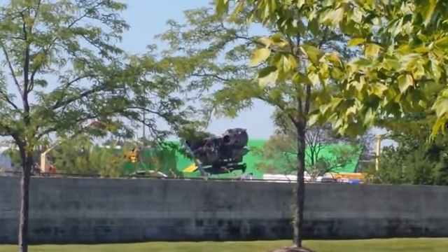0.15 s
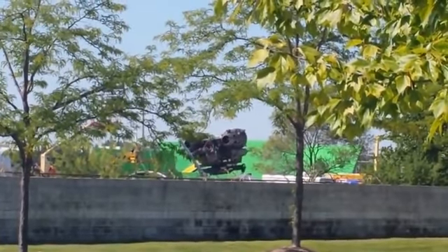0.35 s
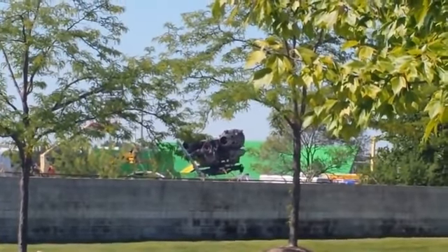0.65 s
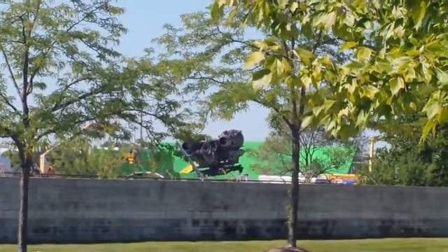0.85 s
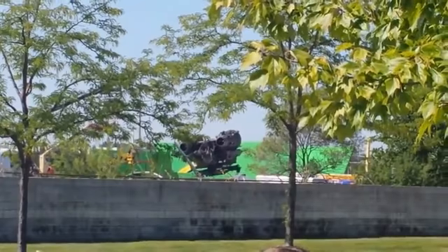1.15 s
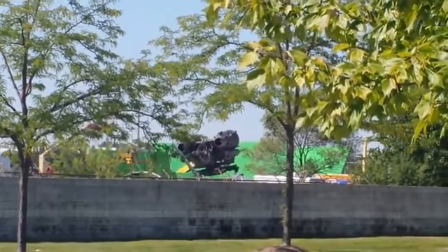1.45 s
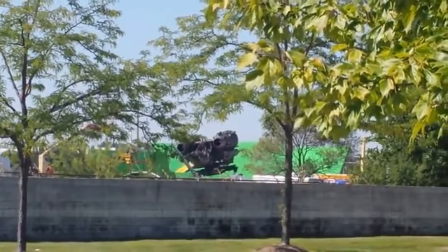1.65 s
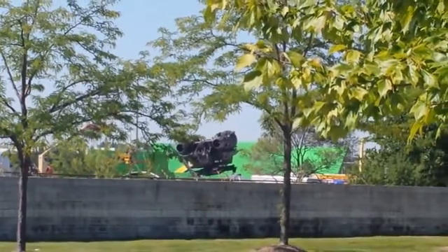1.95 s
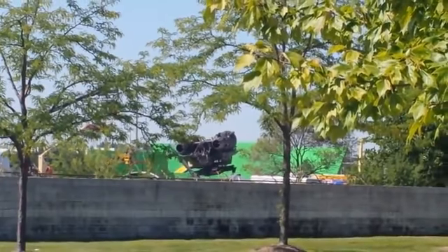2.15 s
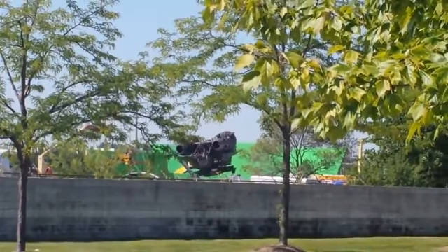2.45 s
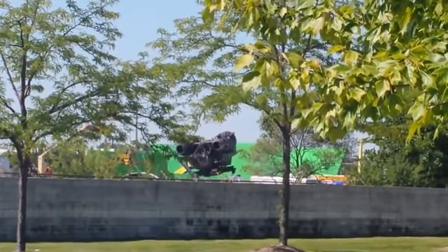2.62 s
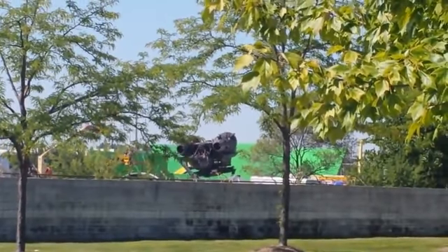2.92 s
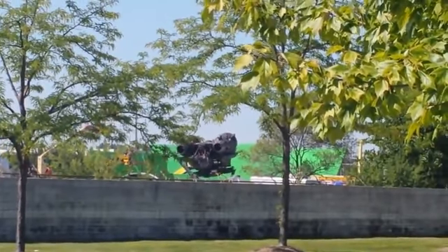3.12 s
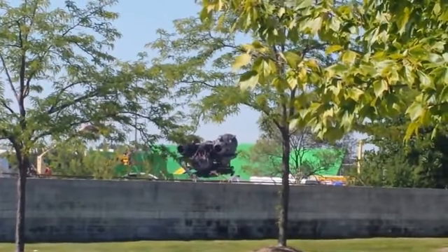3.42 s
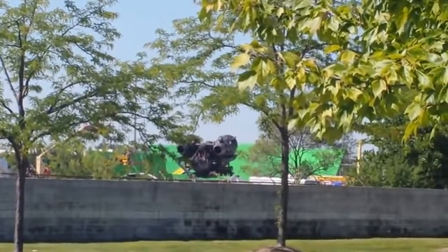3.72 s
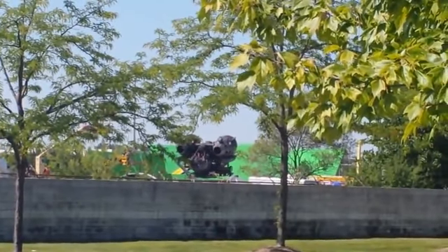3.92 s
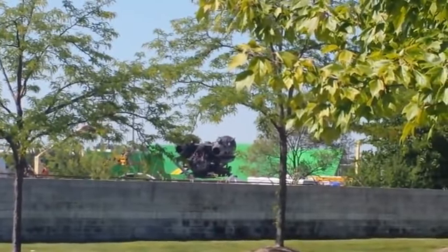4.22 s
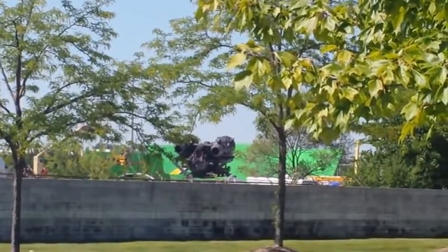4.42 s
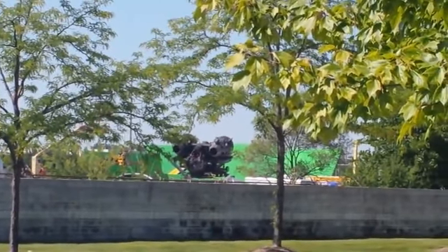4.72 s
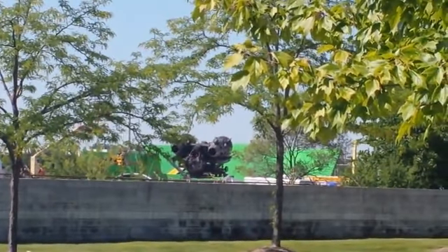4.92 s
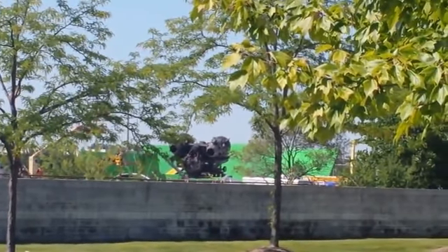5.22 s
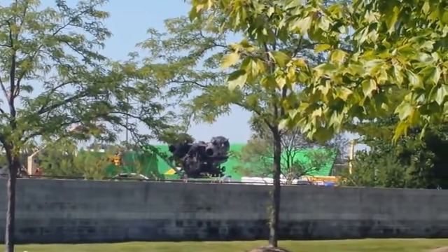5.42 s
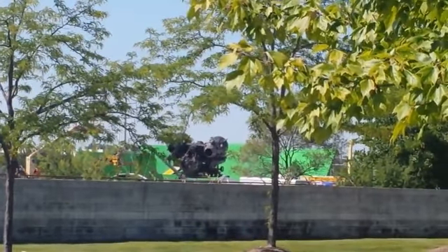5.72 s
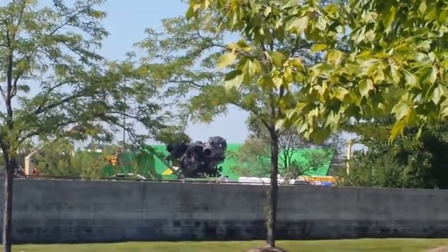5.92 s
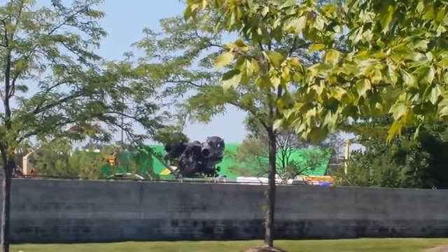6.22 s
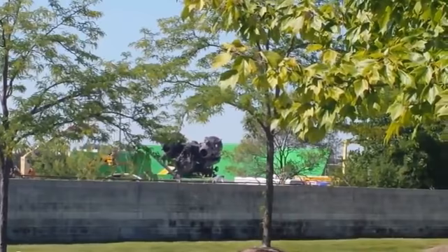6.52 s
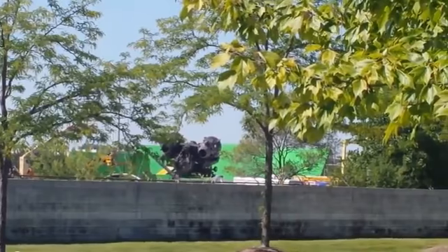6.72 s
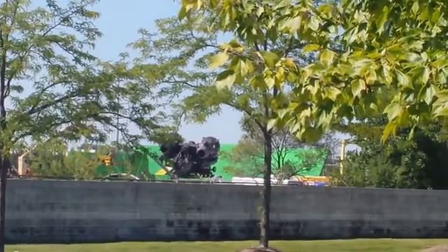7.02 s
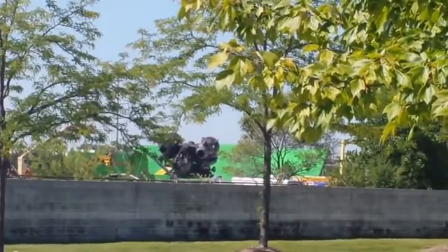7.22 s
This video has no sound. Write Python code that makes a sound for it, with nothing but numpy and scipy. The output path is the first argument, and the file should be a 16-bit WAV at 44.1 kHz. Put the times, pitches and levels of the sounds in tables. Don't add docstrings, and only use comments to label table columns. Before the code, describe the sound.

A small camera microphone outdoors hears bright cricket trills leaning right, above a low wavering hum of distant motors and traffic. A steady cicada buzz fills the middle highs and fades near the end, while a second, rough and hissy cicada swells from halfway. A sharp twig tick comes early, small sparrow chips come in clusters from the left, and dry leaves scuff softly near the close.

```python
import sys
import numpy as np
from scipy import signal
from scipy.fft import rfft, irfft, next_fast_len
from scipy.io import wavfile

SR = 44100
rng = np.random.default_rng(int(sys.argv[2]) if len(sys.argv) > 2 else 0)


def level_to_linear(level):
    exponent = np.asarray(level, float) / 20
    return 10 ** exponent


def persist_wave(psi):
    counts = np.round(np.clip(psi, -1, 1) * 32767).astype(np.int16)
    wavfile.write(sys.argv[1], SR, np.atleast_2d(counts).T)


N = 324576
TIME = np.arange(N) / SR
SLOW_STEP = 64
PORT_LAG = 16


def rms_one(x):
    return x / np.sqrt(np.mean(x ** 2) + 1e-20)


def in_time(rows):
    s, *columns = np.transpose(rows)
    return [np.interp(TIME, s, column) for column in columns]


def at_hz(points, hz, column=1):
    points = np.array(points)
    return np.interp(np.log(hz + 1), np.log(points[:, 0]), points[:, column])


def bumps(rows, at_s, order):
    return sum(gain_db * np.exp(-((at_s - s) / half_s) ** order) for s, half_s, gain_db in rows)


def drift(rate, count):
    pole = np.exp(-2 * SLOW_STEP * np.pi * rate / SR)
    white = rng.standard_normal((count, N // SLOW_STEP + 1002))
    slow = signal.lfilter([1], [1, -2 * pole, pole * pole], white)[:, 1000:]
    return slow / slow.std(axis=1, keepdims=True)


def full(slow):
    return np.repeat(slow, SLOW_STEP)[:N]


def shaped(white, gain_db):
    size = next_fast_len(N)
    hz = np.arange(size // 2 + 1) * SR / size
    return irfft(rfft(white, size) * level_to_linear(gain_db(hz)), size)[..., :N]


def foliage(x, t60):
    tail = rng.standard_normal((2, 4000)) * level_to_linear(-60 * np.arange(4000) / SR / t60)
    tail /= np.linalg.norm(tail, axis=1, keepdims=True)
    return signal.fftconvolve(x[None], tail, axes=1)[:, :N]


def arch(since, top_hz, fall_hz, rise_s, fall_s, climb, tail_db, knee):
    rising = since < 0
    along = np.clip(np.where(rising, since / rise_s, since / fall_s), -1, 1)
    bend = (np.hypot(along, knee) - knee) / (np.hypot(1, knee) - knee)
    hz = top_hz - fall_hz * np.where(along < 0, climb, 1) * bend
    fade = np.tanh(along * np.where(along < 0, .6, 1) / .45) ** 2
    level = level_to_linear(tail_db * fade) * np.sqrt(1 - along ** 6)
    return level * np.sqrt(2) * np.sin(2 * np.pi * np.cumsum(hz) / SR)


def trill(strokes, top_hz, fall_hz, rise_s, fall_s, climb, tail_db, uneven_db):
    nearest = np.round(strokes).astype(int)
    late, louder, sharper = rng.standard_normal((200, 3))[nearest % 200].T
    since = (strokes - nearest) / np.gradient(strokes) / SR + .0007 * late
    whistle = arch(since, top_hz + 20 * sharper, fall_hz, rise_s, fall_s, climb, tail_db, 1.8)
    return level_to_linear(uneven_db * louder) * whistle


def traffic():
    # (frequency [Hz], density [dB per Hz])
    rumble = [(12, -43), (20, -59), (42, -3), (86, -1.5), (136, 1), (160, -3.5), (198, -5.5), (217, -7),
              (238, -10.5), (280, -9.5), (329, -18.5), (455, -21.5), (619, -21), (665, -20), (1500, -34.5),
              (1950, -49), (3300, -120)]
    # (frequency [Hz], left-right likeness [-1..1])
    likeness = [(60, .985), (130, .97), (290, .94), (620, .5), (1100, -.35), (2000, 0.0)]

    def alike(hz):
        return np.clip(at_hz(likeness, hz), -.9, .999)

    mid, side = rng.standard_normal((2, N))
    mid = shaped(mid, lambda hz: at_hz(rumble, hz) + 10 * np.log10(1 + alike(hz)))
    side = shaped(side, lambda hz: at_hz(rumble, hz) + 10 * np.log10(1 - alike(hz)))
    return level_to_linear(-35) * rms_one(mid + side * [[1], [-1]]) * level_to_linear([[.6], [-.6]])


def engines():
    # (rate [Hz], [(multiple, level [dB])])
    motors = [(209.5, [(1, 1)]), (189.0, [(1, 3.5), (3, -13.5), (4, -17.5)])]
    idle_db = [-42.5, -44.5, -48]
    # (middle [s], half length [s], gain [dB])
    surges = [
        [(.68, .2, 10), (1.4, 0.17, 10), (2.62, 0.065, 11), (3.0, 0.23, 8), (3.7, 0.11, 6), (4.15, 0.15, -15),
         (5.0, .3, 7), (5.85, 0.19, 9.5), (6.46, 0.12, 12.5), (7.03, 0.14, 11.5)],
        [(.2, 0.95, 3), (.94, 0.27, 4.5), (2.47, 0.24, 11), (3.0, 0.14, 5.5), (3.73, .15, 7), (4.85, 0.52, 7),
         (5.6, 0.64, 2.5), (6.25, 0.26, 3.5), (7.2, 0.43, 4)],
        [(.1, 0.44, 6.5), (1.3, 0.57, 6.5), (2.1, 0.19, 5.5), (2.65, .1, -13), (3.3, .4, 7), (5.0, 0.32, 7.5),
         (5.9, 0.62, 5), (6.8, .4, 3)],
    ]
    # (time [s], pitch [Hz], level [dB])
    gear = [(0, 628, -67), (.9, 627, -57), (1.8, 626, -61), (2.1, 625, -52), (2.45, 624, -63),
            (2.7, 624, -50), (4, 628, -59.5), (5.3, 632, -61.5), (5.8, 636, -75)]
    throb_db, *motor_db = [db + bumps(rows, TIME, order=2) for db, rows in zip(idle_db, surges)]
    wobble = drift(1.454, count=3)
    throb_hz = 91.1 + 2.493 * full(wobble[2])
    out = level_to_linear(throb_db - 0.5) * np.sin(2 * np.pi * np.cumsum(throb_hz) / SR)
    for (hz, orders), level_db, wave in zip(motors, motor_db, wobble):
        phase = 2 * np.pi * np.cumsum(hz + .45 * full(wave)) / SR
        out += sum(level_to_linear(level_db + db - 0.5) * np.sin(k * phase) for k, db in orders)
    whine_hz, whine_db = in_time(gear)
    out += level_to_linear(whine_db - 1.5) * np.sin(2 * np.pi * np.cumsum(whine_hz) / SR)
    return out * level_to_linear([[.6], [-.6]])


def rustle():
    # (frequency [Hz], left density [dB per Hz], right density [dB per Hz])
    hiss_colour = [(650, 2, -0.5), (1500, 0, -2), (2270, -1, -7), (3270, -7, -9.5), (4270, -4.5, -7.5),
                   (5520, -2, -9), (6440, 2.5, -2.5), (7230, -3.5, -3), (8830, -5, 7), (8960, -13, -3.5),
                   (9800, -9.5, -7), (12060, -22, -15.5), (12600, -28, -23), (14500, -39, -34)]
    # (time [s], level [dB])
    breeze = [(0, -54.5), (2, -54.3), (4, -54), (6.2, -54), (6.5, -52), (6.8, -54.5), (7.36, -54)]
    # (time [s], level [dB], decay t60 [s])
    scuffs = [(6.488, -42.5, .4), (6.375, -49, .25), (6.585, -48, .15), (6.64, -50, .2), (6.098, -49, .06)]

    def colour(hz):
        return [at_hz(hiss_colour, hz, c) - 60 * (hz < 600) for c in (1, 2)]

    left, right, both = rng.standard_normal((3, N))
    white = np.array([left + 0.41 * np.roll(both, PORT_LAG), right + 0.49 * both])
    scuff = sum(level_to_linear(db - 60 * np.clip(TIME - s, 0, 1) / t60) * (TIME > s) for s, db, t60 in scuffs)
    dry_leaf = signal.butter(2, [2200, 6200], "band", fs=SR, output="sos")
    crackle = signal.sosfilt(dry_leaf, rng.standard_normal((2, N)))
    hiss = level_to_linear(in_time(breeze)[0] + 13) * rms_one(shaped(white, colour))
    return hiss + scuff * rms_one(crackle)


def sparrows():
    # (time of the top [s], top pitch [Hz], fall [Hz], level [dB])
    chips = [(.625, 4300, 300, -58), (.685, 4150, 1200, -57), (.75, 3500, 1000, -60), (.94, 4300, 700, -59),
             (1.795, 4600, 1800, -50), (1.907, 4600, 1900, -49), (1.932, 4100, 600, -53),
             (2.019, 4600, 1400, -50), (2.037, 4100, 1200, -51), (2.141, 4200, 1400, -52),
             (2.152, 4550, 1000, -53), (3.44, 4600, 900, -58), (3.55, 4200, 700, -59),
             (3.833, 4550, 1800, -43), (3.951, 4400, 1400, -44), (4.082, 4400, 1100, -46),
             (3.855, 2850, 200, -55), (4.06, 2650, 200, -56), (6.495, 4000, 200, -55),
             (4.778, 4250, 900, -58), (5.097, 4000, 1100, -51), (5.252, 4950, 1000, -52),
             (5.37, 4250, 1300, -55.5), (6.097, 4600, 1200, -60), (6.6, 5050, 200, -51)]
    out = np.zeros(N)
    for s, top_hz, fall_hz, level_db in chips:
        fall_s = .005 + fall_hz / 125000
        near = slice(round((s - .05) * SR), round((s + .06) * SR))
        out[near] += level_to_linear(level_db) * arch(TIME[near] - s, top_hz, fall_hz, .010, fall_s, .25, -5.5, .5)
    direct = np.array([level_to_linear(5) * out, level_to_linear(-5) * np.roll(out, 1)])
    return direct + level_to_linear(-12) * foliage(out, .08)


def twigs():
    # (time [s], peak [dB], ring [Hz], decay t60 [s])
    ticks = [
        (1.2758, -9.5, 5700, 0.004),
        (1.2758, -27, 2000, .005),
        (1.2758, -40, 12500, .004),
    ]
    out, since = np.zeros(N), TIME[:2000]
    for s, level_db, hz, t60 in ticks:
        onset = np.tanh(since / 0.00028)
        ring = level_to_linear(level_db - 60 * since / t60) * onset * np.sin(2 * np.pi * hz * since)
        out[round(s * SR):][:2000] += ring
    return out * level_to_linear([[1.5], [-12]])


def swelling_cicada():
    # (time [s], buckling rate [Hz], effort [dB])
    song = [(0, 160, -67), (2.5, 160, -78), (3.5, 160, -47), (4.5, 160.5, -45.5), (5.3, 161, -42),
            (5.9, 162.3, -38.5), (6.3, 162.7, -38), (6.6, 163.1, -36.5), (7.0, 163.2, -34.5),
            (7.36, 163.5, -32)]
    # (frequency [Hz], left [dB], right [dB])
    drum_colour = [(4100, -17.5, -25.5), (5220, -9.5, -13), (6400, 0, -13), (6380, -12, -5),
                   (6780, -5, -1.5), (7940, 0.5, 3.5), (7920, -3, 0), (8840, -11, -1), (9280, -10, -5.5),
                   (11000, -17.5, -15), (12050, -19.5, -13.5), (13500, -19, -31), (14300, -42, -42),
                   (14400, -27, -24)]
    rate_hz, effort_db = in_time(song)
    phase = 2 * np.pi * np.cumsum(rate_hz) / SR
    start = 9 * SR // 2
    flicker = drift(17.4, count=4 * 56).reshape(56, 2, 2, -1)
    comb = np.zeros((2, N))
    for k, sides in zip(range(29, 81), flicker):
        sine, cosine = np.sin(k * phase[start:]), np.cos(k * phase[start:])
        for side, (a, b) in enumerate(sides):
            comb[side, start:] += full(a)[start:] * sine + full(b)[start:] * cosine
    hiss = rng.standard_normal((2, N)) * (1 + .5 * np.cos(phase))
    drums = rms_one(comb) + level_to_linear(7.0) * hiss
    heard = shaped(drums, lambda hz: [at_hz(drum_colour, hz, c) for c in (1, 2)])
    return level_to_linear(effort_db) * rms_one(heard)


def cicada():
    # (time [s], buckling rate [Hz])
    song = [(0, 200.6), (1.25, 201.68), (2, 202.0), (3, 202.62), (4, 202.79), (4.5, 202.74), (5.25, 202.2),
            (5.75, 201.38)]
    # (multiple, left level [dB], right level [dB])
    multiples = [(25, -66.6, -75.2), (26, -68.4, -78.2), (27, -56.3, -67.5), (28, -55.1, -70.3),
                 (29, -52.6, -68.0), (30, -58.7, -70.1), (31, -49.3, -60.3), (32, -64.6, -67.0),
                 (33, -53.9, -60.0), (34, -67.0, -70.3), (35, -51.6, -53.0), (36, -63.4, -62.5),
                 (37, -50.4, -51.1), (38, -63.7, -62.7), (39, -55.0, -55.3), (40, -65.3, -58.4),
                 (41, -54.6, -53.6), (42, -63.6, -56.1)]
    # (multiple, middle [s], half length [s], gain [dB])
    glints = [(27, 0.31, 0.2, 5), (27, 1.7, 0.43, 7), (27, 3.3, 0.9, 9), (28, .95, 0.41, 11),
              (28, 1.86, 0.33, 10), (28, 2.9, 0.25, 7), (29, 0.46, 0.45, 6.5), (29, 2.2, 0.69, 4),
              (29, 3.7, 0.56, 12), (30, 1.31, 0.17, 15.5), (31, 0.9, .2, 5), (31, 2.13, .6, 8.5),
              (31, 3.4, 0.62, 8.5), (31, 4.85, .25, 4), (33, 1.1, 0.73, 4.5), (35, 2.45, .3, 5),
              (35, 3.06, 0.18, 2), (35, 3.43, 0.36, 9), (35, 5.17, .25, 14), (37, 0.61, 0.29, 8.5),
              (37, 1.36, 0.15, 8), (37, 2.43, .2, 7), (37, 3.65, 0.41, 2), (39, 0.31, 0.4, 14),
              (39, 4.1, .65, 10), (41, 1.18, 0.34, 13), (41, 2, .4, 3), (41, 3.33, 1, 12),
              (41, 4.75, 0.18, 10)]
    rate_hz, = in_time(song)
    phase = 2 * np.pi * np.cumsum(rate_hz + .1 * full(drift(3.0, count=1)[0])) / SR
    fades = drift(3.9, count=3 * len(multiples)).reshape(-1, 3, N // SLOW_STEP + 2)[..., :-1]
    out, slow_s = np.zeros((2, N)), TIME[::SLOW_STEP]
    for (k, *side_db), (both, *own) in zip(multiples, fades):
        openings = [row[1:] for row in glints if round(row[0]) == k]
        swell_db = -5 + bumps(openings, slow_s, order=4)
        for side in (0, 1):
            level_db = side_db[side] + swell_db + 2.5 * both + 1.5 * own[side]
            out[side] += full(level_to_linear(level_db)) * np.sin(k * phase + full(0.77 * own[side]) + k * k)
    return out * level_to_linear(2.0 + np.interp(TIME, [4.6, 5.6, 6.4], [0, -3, -25]))


def crickets():
    # (time [s], strokes so far)
    nearest_pace = [(-.1177, 0), (1.629, 32), (2.0715, 40), (2.507, 48), (3.3878, 64), (3.8266, 72),
                    (4.7106, 88), (5.8099, 108), (6.6786, 124), (7.5626, 140)]
    # (time [s], level [dB])
    nearest_level = [(0, -33.3), (1.5, -33.3), (3, -32.8), (4.5, -32.5), (6, -33), (7.36, -32)]
    # (time [s], strokes so far, level [dB])
    second = [(-.2, 0, -42), (.649, 16, -52), (.857, 20, -52.7), (1.482, 32, -41), (2.018, 42, -42),
              (2.554, 52, -45.5), (3.225, 64, -49.5), (3.442, 68, -49.5), (3.856, 76, -47.5),
              (4.289, 84, -41.8), (4.736, 92, -41.5), (5.373, 104, -48.5), (5.816, 112, -47),
              (6.03, 116, -43.4), (6.647, 128, -50), (7.502, 144, -44.5)]
    strokes, level_db = in_time(second)
    near = level_to_linear(in_time(nearest_level)[0]) * trill(in_time(nearest_pace)[0], 8845, 1350, .011, .0135, .14, -7, .8)
    near += level_to_linear(level_db) * trill(strokes, 8540, 550, .012, .012, .9, -4, 2.0)
    far = np.zeros(N)
    for hz, per_s, pace in zip([8440, 8400, 7900, 8340], [11.0, 18.0, 17.8, 18.0], drift(0.44, count=4)):
        far_strokes = np.cumsum(per_s + .4 * full(pace)) / SR
        far += trill(far_strokes, hz, 500, .013, .014, .6, -4, 3.0)
    direct = np.array([level_to_linear(-17) * np.roll(near, PORT_LAG), near])
    scattered = foliage(level_to_linear(-14) * near + level_to_linear(-53.5) * far, .07)
    return direct + scattered * level_to_linear([[-10], [0]])


def scene():
    return crickets() + cicada() + swelling_cicada() + sparrows() + twigs() + engines() + traffic() + rustle()


def band_limit(x):
    return signal.sosfilt(signal.butter(12, 14660, fs=SR, output="sos"), x)


def record(dry):
    return band_limit(dry)


dry = scene()
out = record(dry)
persist_wave(out)
```